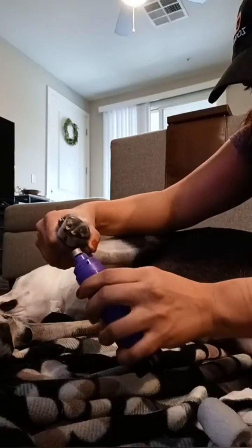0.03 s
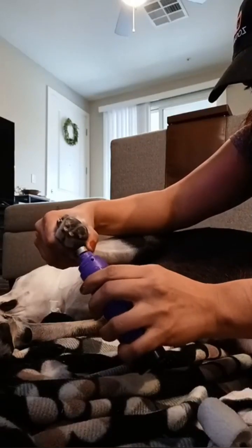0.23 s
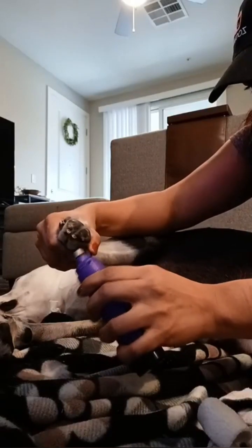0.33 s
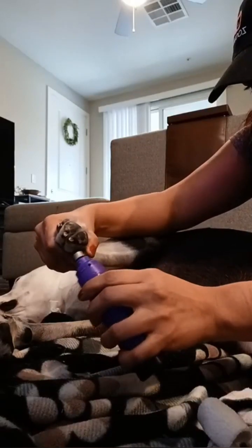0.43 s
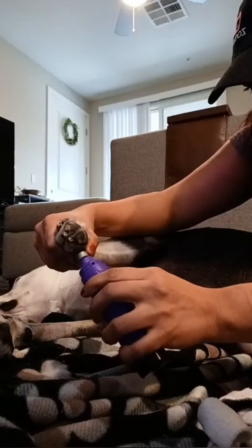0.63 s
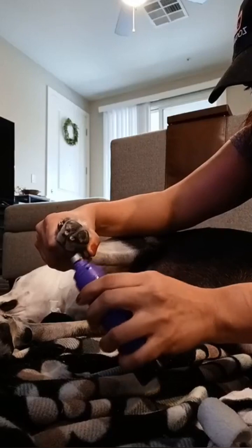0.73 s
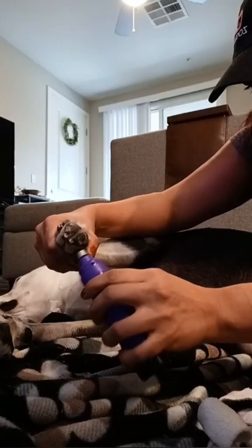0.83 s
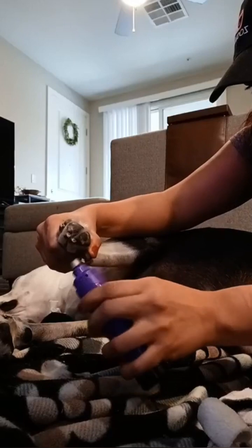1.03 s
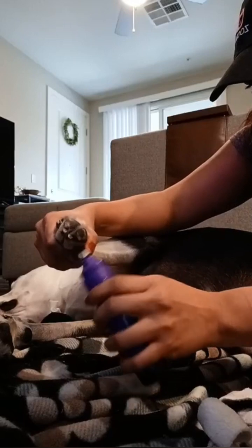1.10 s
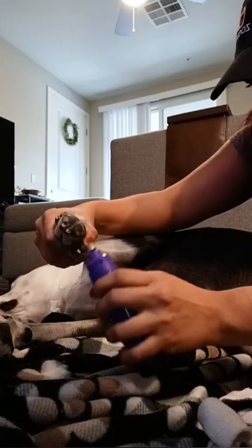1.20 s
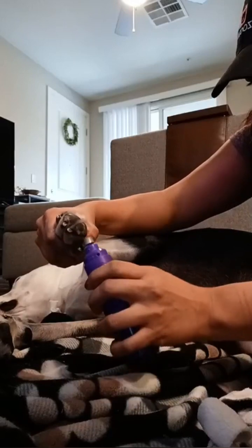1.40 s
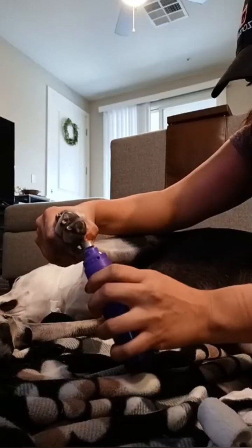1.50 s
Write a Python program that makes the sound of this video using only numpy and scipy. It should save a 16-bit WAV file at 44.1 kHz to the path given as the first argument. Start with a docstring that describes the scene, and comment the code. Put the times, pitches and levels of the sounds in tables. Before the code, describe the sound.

Nail grinder's high thin motor whine, with brief gritty buzzing scrapes on a dog's nail

```python
"""A small electric nail grinder whines in a living room and is pressed against a dog's nail in short strokes.
Its motor is a set of partials locked to the shaft angle, with filtered noise for brush and bright hiss.
Grit impacts rasp; knocks about once a turn excite the nail's resonances; coarse grit catches and cracks.
Load slows the motor, which then recovers. A ventilation fan adds humming tones and a low rush of air."""
import sys
import numpy as np
from scipy import signal
from scipy.fft import rfft, irfft
from scipy.io import wavfile
from scipy.ndimage import uniform_filter1d, map_coordinates

SR = 44100
rng = np.random.default_rng(int(sys.argv[2]) if len(sys.argv) > 2 else 0)


def waveform_to_disk(signal):
    """Save audio, clipped to [-1, 1], as 16-bit WAV at the path in sys.argv[1]."""
    frames = np.transpose(np.atleast_2d(signal))
    scaled = np.clip(frames, -1, 1) * 32767
    samples = np.round(scaled).astype(np.int16)
    wavfile.write(sys.argv[1], SR, samples)


N = 68355
TIME = np.arange(N) / SR  # s
FREE_TURNS_HZ = 128.74  # shaft speed without load

# start of a fourth stroke, for rasp and ring, before their trims: t/s, level/dB
NEXT_STROKE = [(1.546, -64), (1.55, -46.5)]
# colour of the grit noise, relative density per Hz: f/Hz, level/dB
GRIT_SPECTRUM = [(40, -40), (250, -3), (600, -11), (1000, -1.5), (1550, -11), (1900, -5), (2350, 4),
                 (4000, 3.5), (5200, 4.5), (6700, -1.5), (7400, -9), (8800, -15), (10000, -1), (11200, 2.5),
                 (14000, 3), (15500, -7)]


def from_db(db):
    """Amplitude ratio of a level: 20 dB per factor of ten."""
    return 10 ** (np.asarray(db) / 20)


def rms_one(x):
    """Normalise the mean power, so that rms is 1."""
    return x / np.sqrt(np.mean(x ** 2) + 1e-20)


def stroke_gain(curves):
    """Amplitude envelope: levels interpolated linearly in dB, silent outside each curve."""
    gain = np.zeros(N)
    for curve in curves:
        seconds, db = np.transpose(curve)
        gain += from_db(np.interp(TIME, seconds, db, left=-np.inf, right=-np.inf))
    return gain


def coloured(x, spectrum):
    """Spectral shaping: weight each frequency by a curve over log frequency, then set rms to 1."""
    hz, db = np.transpose(spectrum)
    bins = np.maximum(np.fft.rfftfreq(N, 1 / SR), 1)
    weight = from_db(np.interp(np.log(bins), np.log(hz), db))
    return rms_one(irfft(rfft(x) * weight, N))


def drift(rate):
    """Low-passed noise: a random wander of rms 1, weakening above the rate in Hz."""
    bins = np.fft.rfftfreq(N, 1 / SR)
    weight = (bins > 0) / (1 + (bins / rate) ** 2)  # no constant offset
    return rms_one(irfft(rfft(rng.standard_normal(N)) * weight, N))


def shaft(pressure):
    """Shaft angle and loss of speed: friction drags the speed down, inertia smooths the change."""
    full_sag_hz, full_pressure_db = 10, -35  # steady loss of speed at this pressure level
    recovery_s, start_sag_hz, speed_jitter = 0.06, 3.1, 0.00026
    r = np.exp(-1 / (recovery_s * SR))
    drag = full_sag_hz * pressure / from_db(full_pressure_db)
    sag, _ = signal.lfilter([1 - r], [1, -r], drag, zi=[start_sag_hz])
    turns_hz = (FREE_TURNS_HZ - sag) * (1 + speed_jitter * drift(25))
    return 2 * np.pi * np.cumsum(turns_hz) / SR, sag


def partials(angle, sag, lines, waver_db):
    """Phase locking: wavering tones follow the shaft speed and weaken under load, low ones most."""
    waver_hz = 5
    loss_db_per_hz, loss_at_hz = 0.1, 2000  # dB per Hz of lost shaft speed, for a tone at 2000 Hz
    total = np.zeros(N)
    for hz, db in lines:
        loss_db = loss_db_per_hz * sag * loss_at_hz / hz
        gain = np.sqrt(2) * from_db(db + waver_db * drift(waver_hz) - loss_db)
        total += gain * np.sin(angle * hz / FREE_TURNS_HZ + rng.uniform(0, 2 * np.pi))
    return total


def brushes(angle):
    """Amplitude-modulated noise: brush hiss pulses three times a turn and partly repeats each turn."""
    # colour of the brush hiss, relative density per Hz: f/Hz, level/dB
    brush_spectrum = [(700, -11.5), (1200, 0.5), (1600, -35), (2100, -8), (3000, -23), (4000, -10),
                      (6200, -3.5), (7300, -17), (8600, -38), (10200, -1), (11800, 13), (13500, 5),
                      (15400, 0)]
    level_db, waver_db, waver_hz = -58, -0.8, 12
    throb, repeat_share = 0.37, 0.6
    track = rng.standard_normal(int(SR / FREE_TURNS_HZ))  # noise around one turn
    position = angle / (2 * np.pi) % 1 * len(track)
    repeating = map_coordinates(track, [position], mode="grid-wrap")
    hiss = rng.standard_normal(N) + repeat_share * repeating
    hiss *= 1 + throb * np.cos(3 * angle)
    return from_db(level_db + waver_db * drift(waver_hz)) * coloured(hiss, brush_spectrum)


def swish():
    """Quadrature modulation: a bright band of motor hiss moves as the grinder is turned."""
    # centre of the moving band: t/s, f/Hz
    band_path = [(0, 13200), (0.5, 12000), (1.05, 13370), (1.23, 11370), (1.42, 13700), (1.55, 13900)]
    level_db, half_width_hz = -67.5, 1450
    centre = 2 * np.pi * np.cumsum(np.interp(TIME, *np.transpose(band_path))) / SR
    low_pass = signal.butter(2, half_width_hz, fs=SR, output="sos")
    a, b = signal.sosfilt(low_pass, rng.standard_normal((2, N)))
    return from_db(level_db) * rms_one(a * np.cos(centre) + b * np.sin(centre))


def motor(angle, sag):
    """Superposition of the motor's lower and higher partials with its two hisses."""
    # whine at free speed, before trim and waver: f/Hz, level/dB
    whine_lines = [(1157, -73.5), (1933, -66.5), (3090, -78), (3478, -60), (3731, -73), (3860, -66),
                   (4247, -61), (4635, -76), (5023, -72), (5146, -79), (5405, -68.5), (5792, -70),
                   (5922, -83), (6051, -80), (6180, -65.5), (6562, -74), (6950, -77.5), (7337, -89.5),
                   (8107, -84.5), (8366, -98)]
    # high whistle at free speed, before trim and waver: f/Hz, level/dB
    whistle_lines = [(11310, -74), (12215, -66), (12602, -62), (12985, -66), (13372, -65), (13501, -74),
                     (13760, -64), (14142, -68), (14530, -68), (14917, -76), (15046, -79), (15305, -78)]
    whine = from_db(0.5) * partials(angle, sag, whine_lines, waver_db=0.6)
    whistle = from_db(-2) * partials(angle, sag, whistle_lines, waver_db=1.2)
    return whine + whistle + brushes(angle) + swish()


def fan():
    """Additive synthesis of a wavering hum and a drone, over noise shaped as a low rush of air."""
    # steady-pitched hum tones, before trim and waver: f/Hz, level/dB
    hum_lines = [(94, -60), (165, -67), (237, -55), (282, -64), (312.6, -62), (344, -66), (406, -71),
                 (473.5, -75)]
    # level of one strong fan tone, before trim: t/s, level/dB
    drone_curve = [(0.0, -53), (0.03, -54), (0.522, -61.5), (0.612, -49.5), (0.698, -53), (0.764, -69),
                   (0.806, -58), (1.35, -56), (1.398, -50), (1.466, -68.5), (1.55, -60)]
    # colour of the rush of air, relative density per Hz: f/Hz, level/dB
    air_spectrum = [(25, -30), (55, -14.5), (85, -5.5), (120, -2), (175, -5.5), (250, 8.5), (300, -4.5),
                    (380, 1), (480, -11.5), (600, -11), (750, -31.5), (1500, -26.5), (4000, -26)]
    hum_trim_db, hum_waver_db, waver_hz = -2, 2.5, 1.7
    drone_hz, drone_trim_db, air_db = 125.2, 1, -55.5
    hum = np.zeros(N)
    for hz, db in hum_lines:
        gain = from_db(db + hum_trim_db + hum_waver_db * drift(waver_hz))
        hum += gain * np.sin(2 * np.pi * (hz * TIME + rng.random()))
    drone_gain = from_db(drone_trim_db + np.interp(TIME, *np.transpose(drone_curve)))
    drone = drone_gain * np.sin(2 * np.pi * drone_hz * TIME)
    air = from_db(air_db) * coloured(rng.standard_normal(N), air_spectrum)
    return np.sqrt(2) * (hum + drone) + air


def nail(x):
    """Modal synthesis: parallel damped resonances of the nail and the tip."""
    # modes of nail and tip: f/Hz, bandwidth/Hz, relative level/dB
    modes = [(2331, 77, -9.5), (2478, 106, -13.5), (2900, 135, -15), (3190, 65, -8), (3350, 49, -0.5),
             (3370, 61, 2.5), (3506, 113, -1.5), (3693, 98, -4.5), (11180, 240, -20.5)]
    out = np.zeros(N)
    for k, (hz, width, db) in enumerate(modes):
        r = np.exp(-np.pi * width / SR)
        poles = [1, -2 * r * np.cos(2 * np.pi * hz / SR), r * r]
        # the tiny offset keeps the input from being exactly zero
        mode = signal.lfilter([1 - r, 0, r - 1], poles, x + 1e-18)
        out += (-1) ** k * from_db(db) * mode  # alternate modes have opposite sign
    return out


def fading_ring():
    """Exponential decay: room tail of a stroke that has just ended, ring and rasp at equal power."""
    start_db, decay_db_per_s = -54.5, 107  # start level of each part
    ring = rms_one(nail(rng.standard_normal(N)))
    grit = coloured(rng.standard_normal(N), GRIT_SPECTRUM)
    return from_db(start_db - decay_db_per_s * TIME) * (ring + grit)


def rasp(angle, pressure):
    """Shot noise: dense random grit impacts and fine dust, swelling once a turn."""
    trim_db, grains_per_s, grain_spread_db = 1, 5600, 4
    dust_share, throb = 0.61, 0.12
    sizes = from_db(grain_spread_db * np.minimum(rng.exponential(1, N), 4))
    sizes *= rng.choice([-1, 1], N)
    grains = rms_one(sizes * (rng.random(N) < grains_per_s / SR))
    grit = grains + dust_share * rng.standard_normal(N)
    grit *= 1 + throb * np.cos(angle)
    return from_db(trim_db) * pressure * coloured(grit, GRIT_SPECTRUM)


def chatter(angle):
    """Forced resonance: knocks about once a turn, and scraping between, make the nail ring."""
    # bouncing of the tip as level of the ring, during three strokes, before trim: t/s, level/dB
    bounce_curves = [
        [(0.201, -41), (0.209, -26), (0.221, -37), (0.226, -63)],
        [(0.232, -47), (0.262, -29.5), (0.28, -23.5), (0.29, -31), (0.326, -39), (0.331, -33)],
        [(0.548, -37), (0.564, -37), (0.606, -33.5), (0.63, -43), (0.634, -36), (0.656, -39.5), (0.66, -56)],
        [(0.873, -55), (0.897, -30.5), (0.909, -35), (0.925, -34), (0.94, -62)],
    ]
    trim_db, scrape_share = -1, 0.69
    knock_spread_db, wobble_rad, wobble_hz = 3.5, 0.7, 60
    wobbly_angle = np.maximum.accumulate(angle + wobble_rad * drift(wobble_hz))
    turns = np.floor(wobbly_angle / (2 * np.pi))
    knocks = np.diff(turns, prepend=turns[0]) * from_db(knock_spread_db * rng.standard_normal(N))
    ring = nail(rms_one(knocks) + scrape_share * rng.standard_normal(N))
    # level the ring over 700 samples (16 ms), so that the curves set its loudness
    even = ring / np.sqrt(uniform_filter1d(ring ** 2, size=700) + 1e-12)
    return from_db(trim_db) * stroke_gain(bounce_curves + [NEXT_STROKE]) * even


def catches():
    """Impulse response: coarse grit snags, giving a short bright crack and a ping of the nail."""
    # hard catches of the grit, before the crack and ping trims: t/s, level/dB
    snags = [(0.2166, -27), (0.2385, -24.5), (0.2578, -14.5), (0.2776, -22), (0.6354, -25), (0.8979, -29.5),
             (0.9163, -23), (0.9254, -34)]
    crack_trim_db, ping_trim_db = -9, -4
    decay_s, low_cut_hz = 0.0027, 4000
    envelope, clicks = np.zeros(N), np.zeros(N)
    for s, db in snags:
        envelope += from_db(db) * (TIME >= s) * np.exp(-np.abs(TIME - s) / decay_s)
        clicks[int(s * SR)] = from_db(db)
    pings = nail(clicks)
    pings *= clicks.max() / np.abs(pings).max()  # strongest ping peaks as high as strongest click
    high_pass = signal.butter(2, low_cut_hz, "high", fs=SR, output="sos")
    cracks = signal.sosfilt(high_pass, envelope * coloured(rng.standard_normal(N), GRIT_SPECTRUM))
    return from_db(crack_trim_db) * cracks + from_db(ping_trim_db) * pings


def room(x):
    """Diffuse reverberation: convolution with exponentially decaying noise of a furnished room."""
    level_db, t60_s, delay_s = -13.5, 0.51, 0.012
    decay = np.exp(-np.log(1000) * TIME / t60_s)  # 60 dB down after t60_s
    tail = rng.standard_normal(N) * decay * (TIME > delay_s)
    return from_db(level_db) * signal.fftconvolve(x, tail / np.linalg.norm(tail))[:N]


def scene():
    """Superposition of motor, grinding, room and fan, with pressure coupling rasp and shaft speed."""
    # pressure on the nail as level of the rasp, one curve per stroke, before trim: t/s, level/dB
    pressure_curves = [
        [(0.201, -50), (0.207, -38.5), (0.219, -42.5), (0.229, -55.5), (0.241, -38), (0.307, -36),
         (0.332, -45.5)],
        [(0.547, -51.5), (0.557, -45.5), (0.583, -48), (0.619, -32.5), (0.651, -36.5), (0.662, -45)],
        [(0.873, -50.5), (0.883, -37), (0.919, -37.5), (0.937, -46), (0.942, -53.5)],
    ]
    ring_send_db = -15  # the ring reaches the room less than the grit sounds do
    pressure = stroke_gain(pressure_curves + [NEXT_STROKE])
    angle, sag = shaft(pressure)
    grinder = motor(angle, sag)
    background = fan()
    fading = fading_ring()
    grit = rasp(angle, pressure) + catches()
    ring = chatter(angle)
    reverberation = room(grit + from_db(ring_send_db) * ring)
    return (grinder + grit + ring + reverberation + fading + background)[None]


def record(dry):
    """Band limitation: a steep elliptic low-pass cuts the top."""
    low_pass = signal.ellip(12, 0.1, 80, 15470, fs=SR, output="sos")  # ripple dB, stop dB, edge Hz
    return signal.sosfilt(low_pass, dry)


dry = scene()
out = record(dry)
waveform_to_disk(out)
```